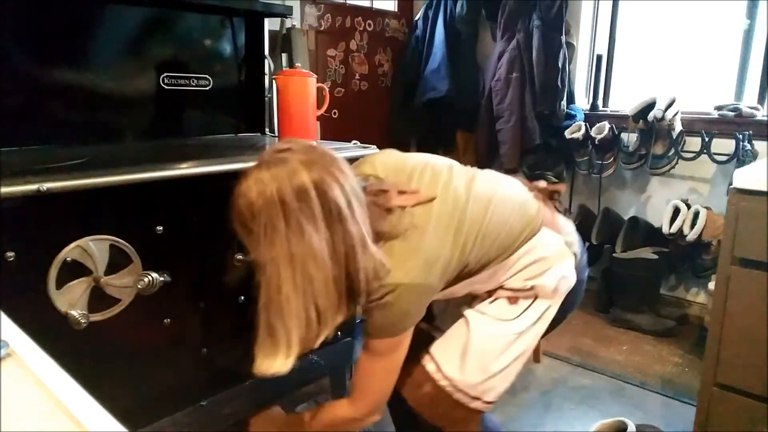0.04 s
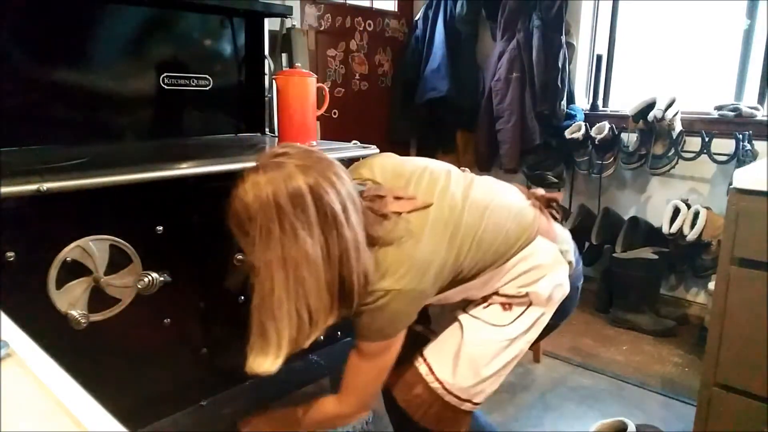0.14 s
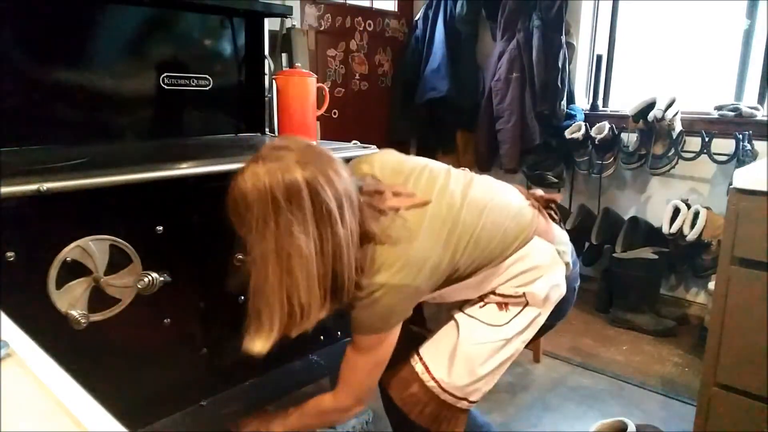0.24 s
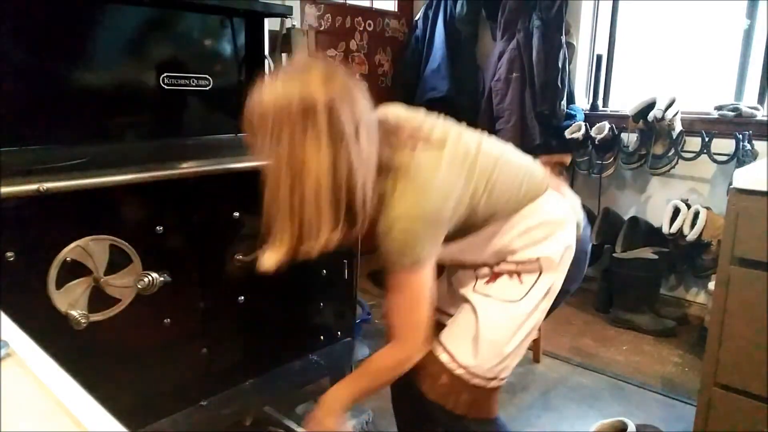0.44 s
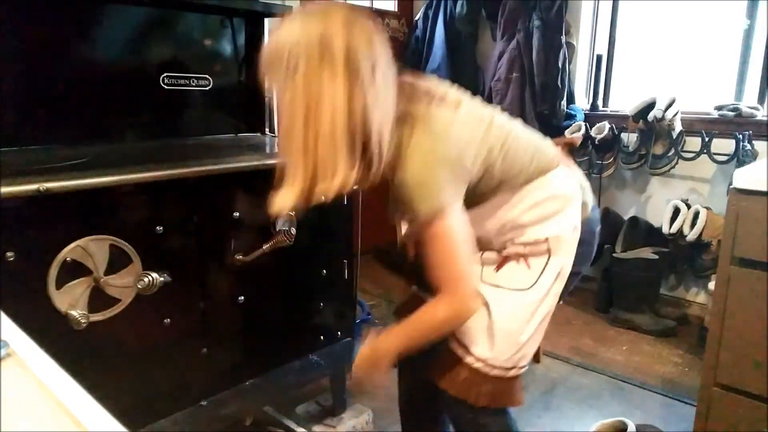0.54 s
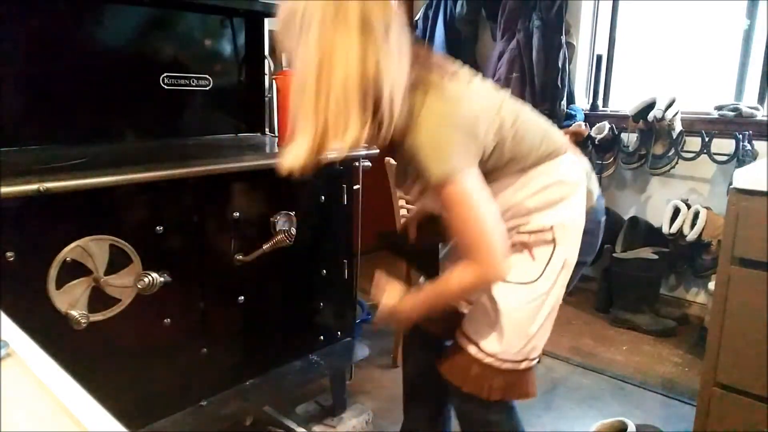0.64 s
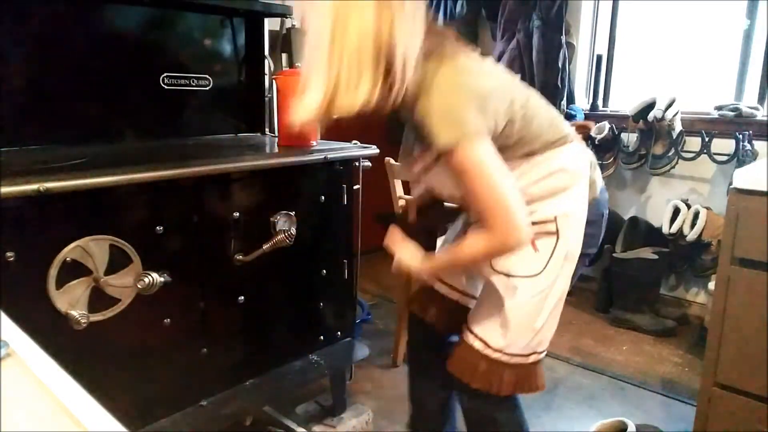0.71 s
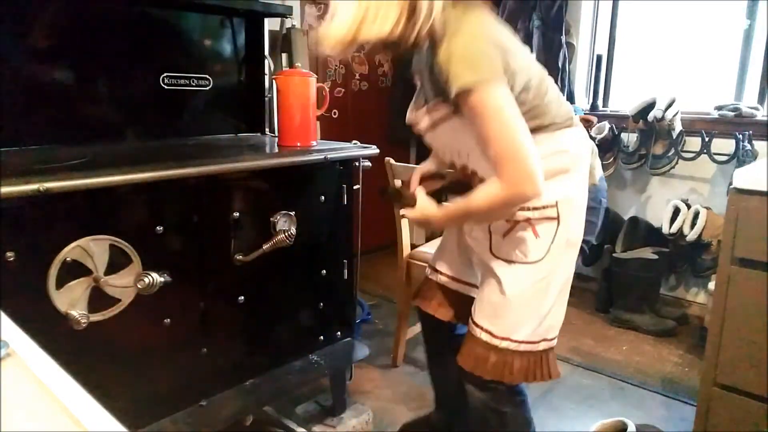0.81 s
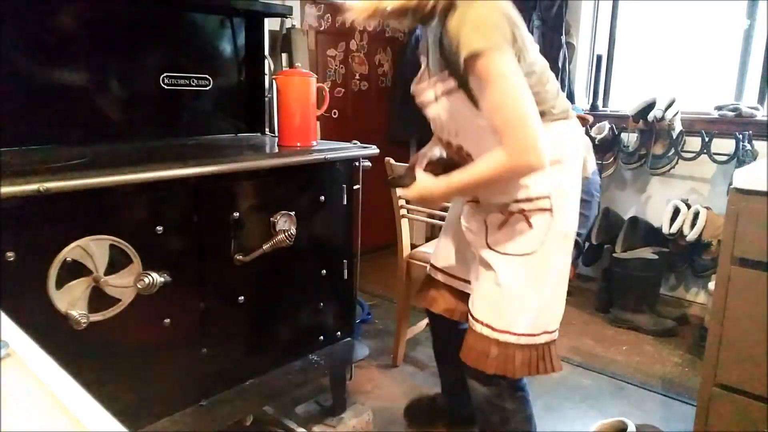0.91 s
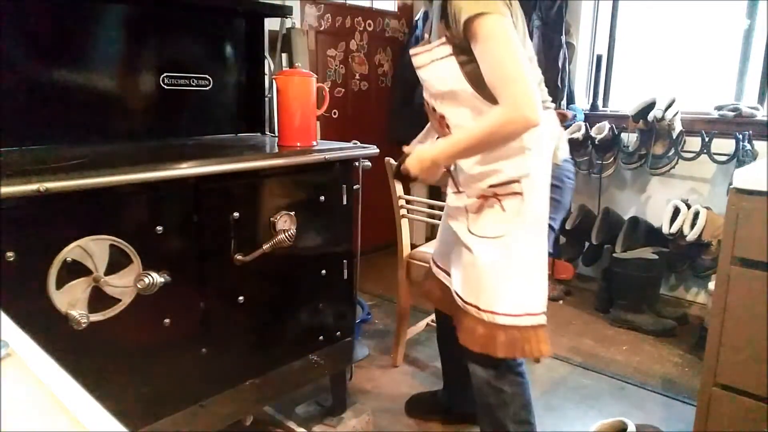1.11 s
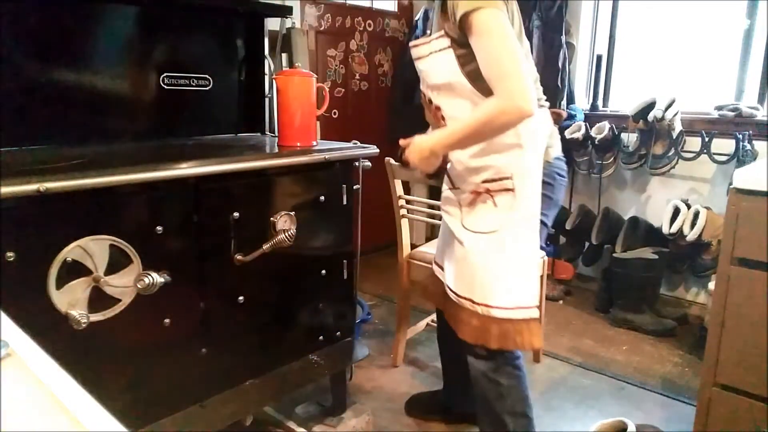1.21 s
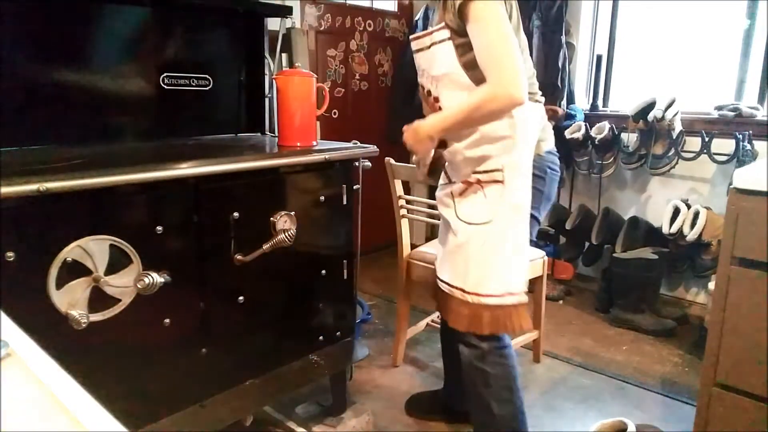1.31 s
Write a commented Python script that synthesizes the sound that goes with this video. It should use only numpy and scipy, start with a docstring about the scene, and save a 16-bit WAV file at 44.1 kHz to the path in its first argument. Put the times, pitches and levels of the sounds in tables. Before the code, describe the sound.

Close up in a home kitchen, a metal stove door is pushed shut: faint bumps, a short sharp scrape, a hard clattering clank, a light rebound click, ringing iron, then faint cloth rustle and quiet footstep-like thuds.

```python
"""In a kitchen, a sheet-steel door low on a wood stove is pushed shut: dull bumps, a bright scrape along
the frame, a rattling clank and a small rebound, while the cast body rings on. Later cloth rustles and
the floor thuds softly, over room tone and the end of an earlier noise. Metal and floor are tiny contacts
or blows sent through dying tones and noise; the body is plain sines; cloth and room are shaped noise."""
import sys
import numpy as np
from scipy import signal
from scipy.fft import rfft, irfft, next_fast_len
from scipy.io import wavfile
from scipy.ndimage import map_coordinates

SR = 44100
rng = np.random.default_rng(int(sys.argv[2]) if len(sys.argv) > 2 else 0)


def gain_from_db(level_db):
    """Turn a decibel level (scalar or array-like) into a linear amplitude factor."""
    decades = np.asarray(level_db, float) / 20
    return 10 ** decades


def persist_wave(psi):
    """Save psi, clipped to +-1, as 16-bit WAV."""
    counts = np.round(np.clip(psi, -1, 1) * 32767).astype(np.int16)
    wavfile.write(sys.argv[1], SR, np.atleast_2d(counts).T)


N = 59535  # length in samples

# In every table, t60 is the time in which a sound dies by 60 dB.
# Spectra give only the shape; the noise made from them is scaled afterwards.

# Clanks of the door: t/s, rattle level/dB before the lift in clanks(), blow level/dB, rattle t60/s,
# tilt/(dB per octave)
CLANKS = [(0.3186, -14, -9.5, 0.04, -.5), (0.334, -17.5, -21, .08, -1.5), (.352, -20.5, -21.5, 0.11, -1.5),
          (0.373, -38.5, -25, 0.076, -2)]
RATTLE_LIFT_DB = 8.0
RATTLES_PER_S, RATTLE_SPREAD_DB = 1600, 3
# Tones of the door panel: f/Hz; then for each: level/dB, t60/s
DOOR_HZ = [630, 705, 920, 1105, 1291, 1823, 3931, 4237, 4490, 4940, 5412, 5455, 6680, 6968, 7926, 8074,
           10665, 11254, 11524, 11974]
DOOR_TONES = [(-10, 0.21), (-11.5, 0.52), (-9, 0.2), (-11.5, .25), (-15.5, 0.13), (-10.5, 0.23),
              (-14.5, .15), (-8, .25), (-3.5, 0.26), (-10, 0.15), (-9, 0.31), (-4, 0.17), (-4.5, 0.26),
              (-7.5, 0.28), (1.5, 0.26), (-6.5, .15), (1, 0.1), (-3.5, 0.11), (-7, 0.13), (-6.5, .16)]
# Dense tones of the door: f/Hz, level/(dB per Hz); how they die, with the room: f/Hz, t60/s
DOOR_WASH = [(35, -56.5), (60, -16.5), (215, -22), (385, -9.5), (464, -19.5), (628, -3.5), (810, -9),
             (1100, -6.5), (1380, -6), (1790, -6), (2650, -7), (7900, -1.5), (9300, -12.5), (10900, 1),
             (15500, -31.5)]
DOOR_DIES = [(100, 1.4), (300, 0.74), (700, .55), (1500, 0.43), (2700, 0.34), (5000, .28), (12000, .19)]
# First bite of each door contact: f/Hz, level/(dB per Hz); how it dies: f/Hz, t60/s
CRACK = [(300, -60.5), (1000, -24), (3000, 1), (6000, 0.5), (8200, 1), (9300, -20.5), (11000, -9),
         (15500, -32), (16000, -88)]
CRACK_DIES = [(1000, 0.053), (8000, 0.02)]
DOOR_RING_DB, CRACK_DB = -4.5, -3.5  # beside the door wash

# Scrape along the frame, strength of contact: t/s, level/dB
SCRAPE = [(.237, -84), (.2405, -9.5), (.262, -22), (.274, -26.5), (.277, -9), (.295, -19), (.309, -24.5),
          (.315, -76)]
# The edge catches: t/s, level/dB
SNAGS = [(0.2389, -24.5), (0.2744, -17.5)]
CONTACTS_PER_S, SPREAD_DB = 2500, 2.5
# Tones of the frame: f/Hz; then for each: level/dB, t60/s
FRAME_HZ = [562, 3920, 4996, 5210, 5587, 5762, 5938, 6337, 6728, 7740, 8260, 10657, 11300]
FRAME_TONES = [(-4, 0.42), (-9.5, .08), (-6, 0.062), (-7, .1), (-4, .12), (0.5, .12), (-1, 0.19),
               (-3.5, 0.093), (-4.5, .12), (-4.5, 0.059), (-1.5, 0.17), (-6, 0.091), (-8.5, .1)]
# Dense tones of the frame: f/Hz, level/(dB per Hz); how they die, with the room: f/Hz, t60/s
FRAME_WASH = [(60, -35), (240, -24), (440, -22.5), (520, -3.5), (572, -0.5), (1060, -5), (1230, -3),
              (2050, -12.5), (2310, -4.5), (4120, -8), (5900, 0), (7040, -7.5), (8280, 0), (9090, -23.5),
              (10900, -6), (15500, -36.5)]
FRAME_DIES = [(150, .8), (600, .5), (1500, 0.73), (2600, .22), (6000, 0.13), (12000, 0.2495)]
FRAME_RING_DB = -16  # beside the frame wash

# Tones of a loose part: f/Hz, level/dB, t60/s
LOOSE_TONES = [(3290, -4, 0.049), (3640, -8, 0.06), (4470, 6, .07), (4450, -9, 0.057), (4440, -3, 0.076),
               (4650, -10, 0.051), (6600, 1, 0.05)]
# Dense tones of the loose part: f/Hz, level/(dB per Hz); how they die: f/Hz, t60/s
LOOSE_WASH = [(180, -42), (300, -23.5), (620, 2), (863, -15.5), (1240, -3), (1620, -10.5), (1750, -6.5),
              (2400, -10), (3100, -9), (4210, -7), (8150, -16), (9300, -21.5), (11000, -11.5),
              (15500, -39.5)]
LOOSE_DIES = [(500, 0.49), (2500, 0.3), (12000, 0.17)]
LOOSE_RING_DB = -9  # beside the loose wash
REBOUND_S, REBOUND_T60_S = 0.5035, 0.1
REBOUND_RATTLE_DB, REBOUND_BLOW_DB = -26.5, -41

# Dull bumps of the door: t/s, level/dB, pitch of the tones as a ratio to the usual
BUMPS = [(.102, -48, 1.07), (.1094, -39.5, 1.06), (.136, -51, .98), (.157, -50, 0.94), (.205, -53, 0.39),
         (.224, -47.5, 0.78)]
# Usual tones of a bump: f/Hz, level/dB, t60/s
BUMP_TONES = [(495, -7.5, .08), (560, -11.5, .07), (700, -5, .07), (1130, -8, .1), (1660, -16.5, 0.053),
              (2610, -17, .08)]
# Dense tones of a bump: f/Hz, level/(dB per Hz)
BUMP_WASH = [(59, -58), (100, -35.5), (582, -15), (660, -4), (867, -29.5), (1210, -18.5), (1370, -23.5),
             (1660, -17), (3530, -37.5), (15000, -55.5)]

# The door sliding in: t/s, level/dB; its dense tones: f/Hz, level/(dB per Hz)
SLIDE = [(.07, -101.5), (.085, -59), (.1, -62), (.13, -72), (.19, -60.5), (.208, -46), (.222, -40),
         (.238, -30), (.245, -77)]
SLIDE_WASH = [(120, -51.5), (420, -24.5), (600, -3.5), (1020, -17), (1240, 0), (1410, -20), (3120, -15.5),
              (3870, -15.5), (5260, -18), (10800, -29), (15000, -43.5)]

# Left-right balance of the door sounds: f/Hz, left minus right/dB
LEAN = [(60, -7), (120, -0.5), (240, -1), (480, -1), (950, 0), (1890, 1.5), (3770, 0), (7520, -7.5),
        (15000, 23)]
THIN_HZ = 123  # thin steel radiates little below this

# Slow ring of the cast body, with close pairs that beat: f/Hz;
# then for each: level/dB, t60/s before the extra damping, left minus right/dB
BODY_HZ = [84, 285, 377, 539, 565, 640, 864, 1192, 1197, 1725.5, 1995.5, 2219.3, 2222]
BODY_TONES = [(-52.5, 2.07, -1), (-43.5, 0.77, -0.5), (-53.5, 3, -2.5), (-49, 3, -2), (-44, 0.65, 0),
              (-54, 1, 0.5), (-50.5, 0.75, -1.5), (-49, 1.5, 5), (-44.5, 1.8, -4.5), (-33, 1.2, -0.5),
              (-35.5, 1.9, 4.5), (-40, 1.7, -8), (-53, 1.5, 5)]
DAMPED_S, DAMPED_FOR_S, DAMPED_DB_PER_S = 0.66, 0.22, 91  # the ring dies faster for a while

# Soft thuds of the floor: t/s, level/dB, pitch of the tones as a ratio to the usual
THUDS = [(1.171, -57.5, 1.3), (1.185, -56.5, 1.075), (1.205, -75, 1.3), (1.2245, -52, 1),
         (1.2358, -57.5, 0.91), (1.251, -57, .95), (1.284, -69, 1.5)]
# Usual tones of the boards: f/Hz, level/dB, t60/s
BOARDS = [(350, -3, 0.075), (501, -5, 0.075), (803, -16, 0.044)]
# Dense tones of a thud: f/Hz, level/(dB per Hz)
THUD_WASH = [(50, -12), (150, -24), (330, 3), (530, -3.5), (1000, -17), (1500, -24.5), (4000, -27),
             (12000, -33), (15500, -64)]
# Low tones of the floor under a landing weight: f/Hz, level/dB, t60/s
JOIST = [(51, 0, 0.29), (89, -1, 0.29)]
JOIST_S, JOIST_DB = 1.232, -54.5

# Cloth: t/s, level/dB before the flutter; its spectrum: f/Hz, level/(dB per Hz)
RUSTLE = [(0.74, -73.5), (0.764, -77), (0.796, -65), (0.83, -67.5), (0.84, -63.5), (0.866, -73.5),
          (0.92, -96)]
CLOTH = [(1500, -60), (3000, -7), (5100, -4), (6000, -9), (7000, -4), (8300, -5), (9300, -30), (11000, -16),
         (13000, -60.5)]

# Spectrum of the room tone: f/Hz, level/(dB per Hz); how its level drifts around AIR_DB: t/s, level/dB
AIR = [(28, -40.5), (40, 0.5), (150, -7), (214, -14), (437, -8.5), (550, -2), (691, -12), (766, -3.5),
       (915, -11.5), (1340, -22.5), (2000, -23.5), (2700, -32), (7600, -32.5), (8850, -37), (10900, -18.5),
       (15500, -32.5)]
HUSH = [(0, -6), (.2, 2), (.6, 3.5), (.85, -1.5), (1, -5.5), (1.35, -5)]
AIR_DB = -62
# An earlier noise still dying in the room: t/s, level/dB; its spectrum: f/Hz, level/(dB per Hz)
FADE = [(0, -63.5), (.07, -62), (.2, -78.5), (.4, -120)]
EARLIER = [(21, -38), (35, -9.5), (119, -5.5), (209, -22.5), (314, 2), (626, -26.5), (793, 2.5),
           (865, -17.5), (1690, -6), (1800, -19), (2090, -11.5), (3430, -28.5), (6000, -35), (7800, -62),
           (13200, -120)]
# How alike left and right are in all noise: f/Hz, likeness (1 = the same, 0 = unrelated)
ALIKE = [(60, 0.97), (500, .6), (1000, 0.24), (4000, 0), (12000, 0)]

HALVES = np.array([[0.5], [-0.5]])  # shares a left-right difference between the channels


def unit(x):
    """Scales a sound to rms 1."""
    return x / np.sqrt(np.mean(x ** 2) + 1e-20)


def along(points, hz):
    """Reads a (Hz, value) table between its points, on a log frequency axis."""
    f, v = np.transpose(points)
    return np.interp(np.log(hz + 1), np.log(f + 1), v)


def curve(rows):
    """Gain for every sample from (s, dB) rows."""
    s, db = np.transpose(rows)
    return gain_from_db(np.interp(np.arange(N) / SR, s, db))


def filtered(x, response):
    """Multiplies the spectrum of x by a response, given as a function of frequency."""
    m = next_fast_len(x.shape[-1] + 8192)
    spectrum = rfft(x, m) * response(np.fft.rfftfreq(m, 1 / SR))
    return irfft(spectrum, m)[..., :x.shape[-1]]


def noise(spectrum, size=N):
    """Coloured stereo noise of rms 1: a shared part and an opposed part set the likeness."""
    def mid_and_side(hz):
        turn = np.arccos(np.clip(along(ALIKE, hz), -1, 1)) / 2
        return gain_from_db(along(spectrum, hz)) * [np.cos(turn), np.sin(turn)]

    mid, side = filtered(rng.standard_normal((2, size)), mid_and_side)
    return unit(np.array([mid + side, mid - side]))


def named(hz, rows):
    """Joins frequencies to their rows."""
    return [(f, *row) for f, row in zip(hz, rows)]


def modes(table, shift=0.78, longest=0.66, scatter=2 * np.pi):
    """The tones of an object as dying sines of energy 1; higher ones are more out of step left to right."""
    t = np.arange(SR) / SR
    attack = 1 - np.exp(-t / 0.0024)
    out = 0
    for hz, db, t60 in table:
        start = rng.uniform(0, scatter)
        phase = start + shift * np.log2(1 + hz / 300) * rng.standard_normal() * HALVES
        decay = gain_from_db(db - 60 * t / np.clip(t60, 0.01, longest))
        out = out + decay * np.sin(2 * np.pi * hz * t + phase) * attack
    return out / np.sqrt(np.sum(out ** 2) / 2)


def wash(spectrum, dies):
    """Countless close tones: noise of energy 1 that starts suddenly, each frequency dying at its own speed."""
    hz, t, z = signal.stft(noise(spectrum, size=SR), SR, nperseg=256)
    t60 = along(dies, hz)[:, None]
    decay = gain_from_db(-60 * np.clip(t - 256 / SR, 0, 1) / t60)
    # dividing by sqrt(t60) keeps long-lived frequencies from gaining energy
    tail = signal.istft(z * decay / np.sqrt(t60), SR, nperseg=256)[1]
    tail = tail[:, 256:SR]  # cut the soft start away
    return np.pad(tail, ((0, 0), (0, 256))) / np.sqrt(np.sum(tail ** 2) / 2)


def contacts(rate=CONTACTS_PER_S, spread_db=SPREAD_DB):
    """A stream of tiny uneven metal contacts at random moments, rms 1."""
    hit = rng.random(N) < rate / SR
    return unit(hit * rng.choice([-1, 1], N) * gain_from_db(spread_db * rng.standard_normal(N)))


def blow(s, db):
    """One sharp contact: a single sample, its level in dB being the rms over 10 ms."""
    return gain_from_db(db) * np.sqrt(SR / 100) * (np.arange(N) == round(s * SR))


def rattle(s, db, t60, stream):
    """A stream of contacts that starts at s and dies away."""
    t = np.arange(N) / SR - s
    return gain_from_db(db - 60 * np.clip(t, 0, 1) / t60) * (t >= 0) * stream


def through(drive, response):
    """Sends contacts through an object: each one sets off the object's response (convolution)."""
    return signal.fftconvolve(drive[None], response, axes=1)[:, :N]


def knocks(events, table, spectrum, t60, wash_db, soft_s, rub_s):
    """Soft blows, each with a short rub after it, into a few tones and a short wash."""
    out = np.zeros((2, N + SR))
    t = np.arange(SR) / SR
    soft_start = 1 - np.exp(-(t / soft_s) ** 2)
    for s, db, pitch in events:
        tones = [(hz * pitch, level, dies) for hz, level, dies in table]
        ring = modes(tones, shift=0.37, scatter=0)
        dense = wash(spectrum, [(100, t60), (8000, t60 * 0.72)])
        sound = (ring + gain_from_db(wash_db) * dense) * soft_start
        drive = gain_from_db(-25 - 60 * t / rub_s) * contacts()[:SR] + (t == 0)
        knock = through(drive / np.linalg.norm(drive), sound)[:, :SR]
        out[:, round(s * SR):][:, :SR] += gain_from_db(db) * np.sqrt(SR / 100) * knock
    return out[:, :N]


def clanks():
    """Each blow and the short rattle after it ring the door panel."""
    ring = gain_from_db(DOOR_RING_DB) * modes(named(DOOR_HZ, DOOR_TONES))
    out = 0
    for s, rattle_db, blow_db, t60, tilt_db in CLANKS:
        stream = contacts(RATTLES_PER_S, RATTLE_SPREAD_DB)
        drive = rattle(s, rattle_db + RATTLE_LIFT_DB, t60, stream) + blow(s, blow_db)
        dense = wash(DOOR_WASH, DOOR_DIES)
        crack = gain_from_db(CRACK_DB) * wash(CRACK, CRACK_DIES)
        panel = through(drive, dense + ring + crack)
        # the tilt flattens out in the lowest few hundred Hz
        out = out + filtered(panel, lambda hz: gain_from_db(tilt_db * np.log2((hz + 300) / 4000)))
    return out


def scrape():
    """The edge chatters along the frame and catches twice, ringing the frame's tones."""
    drive = contacts() * curve(SCRAPE) + sum(blow(s, db) for s, db in SNAGS)
    dense = wash(FRAME_WASH, FRAME_DIES)
    ring = gain_from_db(FRAME_RING_DB) * modes(named(FRAME_HZ, FRAME_TONES))
    return through(drive, dense + ring)


def rebound():
    """A loose part clatters once more: one blow and a short soft rattle ring its tones."""
    drive = rattle(REBOUND_S, REBOUND_RATTLE_DB, REBOUND_T60_S, contacts())
    drive = drive + blow(REBOUND_S, REBOUND_BLOW_DB)
    dense = wash(LOOSE_WASH, LOOSE_DIES)
    ring = gain_from_db(LOOSE_RING_DB) * modes(LOOSE_TONES, longest=0.11)
    return through(drive, dense + ring)


def bumps():
    """Dull bumps of the door: soft blows that each drag on as a rub."""
    return knocks(BUMPS, BUMP_TONES, BUMP_WASH, t60=0.35, wash_db=2, soft_s=0.0024, rub_s=0.09)


def slide():
    """Light rubbing before the edge bites: faint contacts through a very short wash."""
    return through(contacts() * curve(SLIDE), wash(SLIDE_WASH, [(500, 0.035), (8000, 0.03)]))


def steel_to_ears(sound):
    """Leans each frequency left or right and thins the lows, which thin steel radiates weakly."""
    def response(hz):
        return gain_from_db(along(LEAN, hz) * HALVES) * hz ** 2 / (hz ** 2 + THIN_HZ ** 2)

    return filtered(sound, response)


def body():
    """The cast body rings on from the first clank as slowly dying sines, with a spell of faster decay."""
    now = np.arange(N) / SR
    t = np.clip(now - CLANKS[0][0], 0, 2)
    damping = gain_from_db(-DAMPED_DB_PER_S * np.clip(now - DAMPED_S, 0, DAMPED_FOR_S))
    ring = 0
    for hz, db, t60, pan_db in named(BODY_HZ, BODY_TONES):
        level = gain_from_db(db + pan_db * HALVES - 60 * t / t60)
        ring = ring + level * np.sin(2 * np.pi * hz * t + HALVES * hz / 1000)
    return damping * (1 - np.exp(-t / 0.0048)) * ring


def thuds():
    """Soft thuds of the floor: blows into the tones of the boards and a short wash."""
    return knocks(THUDS, BOARDS, THUD_WASH, t60=0.13, wash_db=-1, soft_s=0.0017, rub_s=0.01)


def joist():
    """A weight lands and the floor booms low: one blow into two deep tones."""
    return through(blow(JOIST_S, JOIST_DB), modes(JOIST, shift=0.2, scatter=0))


def cloth():
    """A faint rustle: bright noise whose level flutters unevenly."""
    flutter = map_coordinates(rng.standard_normal(200), [np.arange(N) * 90 / SR])  # 90 points per second
    return curve(RUSTLE) * gain_from_db(1.8 * flutter) * noise(CLOTH)


def room_tone():
    """Steady coloured noise of the room, its level drifting slowly."""
    return gain_from_db(AIR_DB) * curve(HUSH) * noise(AIR)


def earlier_noise():
    """Coloured noise that fades out: an earlier noise still dying in the room."""
    return curve(FADE) * noise(EARLIER)


def scene():
    """Adds the door, the stove body, the floor, the cloth and the background."""
    door = steel_to_ears(slide() + scrape() + rebound() + clanks() + bumps())
    floor = thuds() + joist()
    return door + body() + floor + cloth() + room_tone() + earlier_noise()


def roll_off(x):
    """The treble ends steeply here."""
    return signal.sosfilt(signal.butter(12, 15660, fs=SR, output="sos"), x)


def record(dry):
    """Rounds peaks off smoothly at full scale."""
    mix = dry / (1 + np.abs(dry) ** 6) ** (1 / 6)
    return roll_off(mix)


dry = scene()
out = record(dry)
persist_wave(out)
```